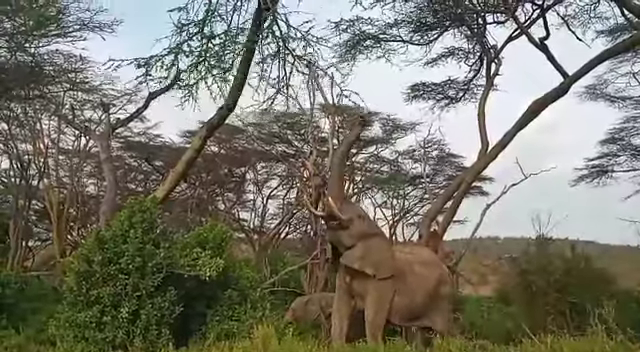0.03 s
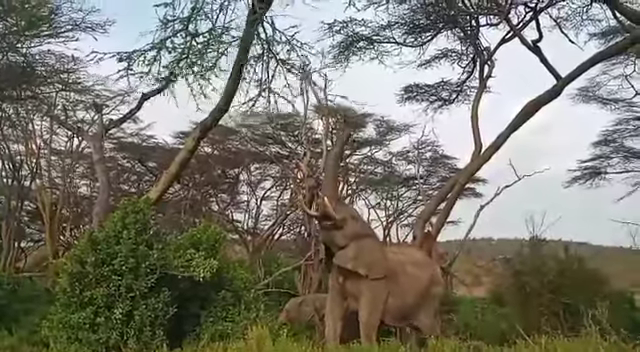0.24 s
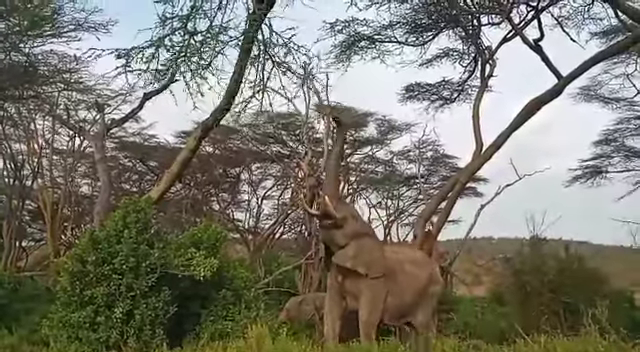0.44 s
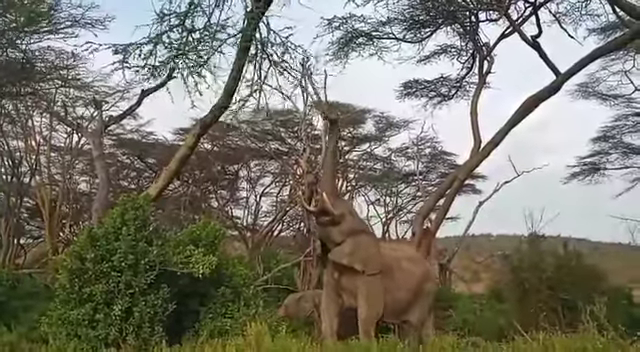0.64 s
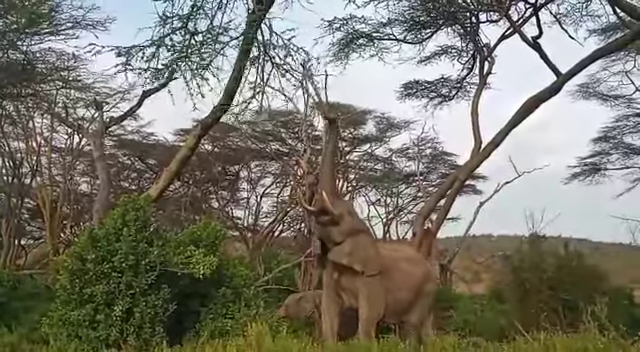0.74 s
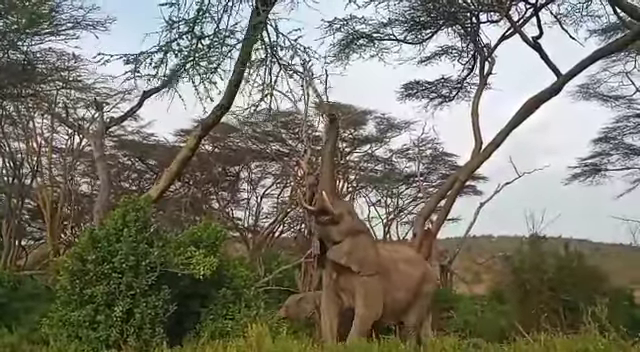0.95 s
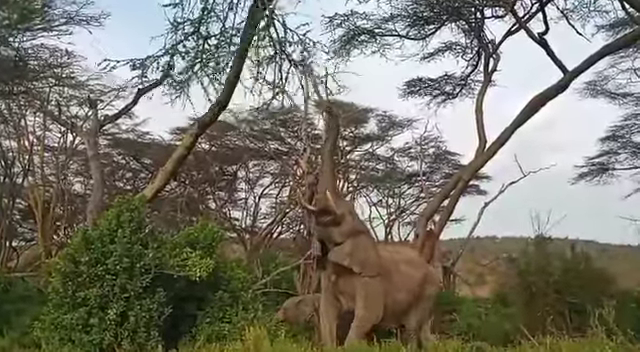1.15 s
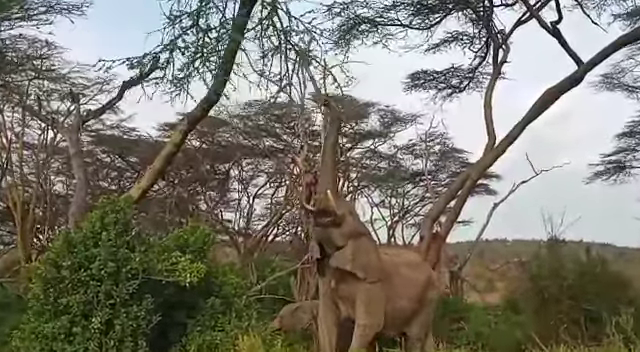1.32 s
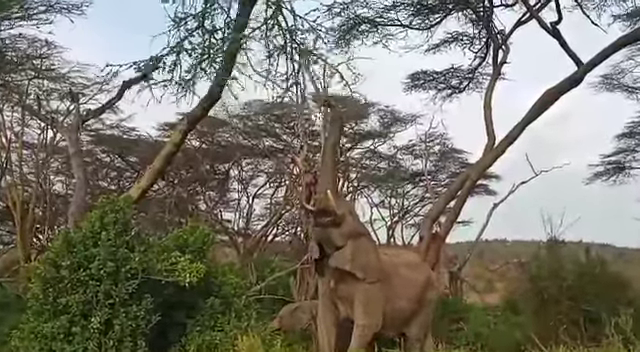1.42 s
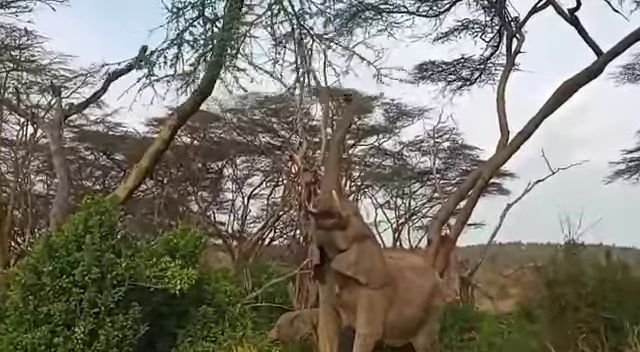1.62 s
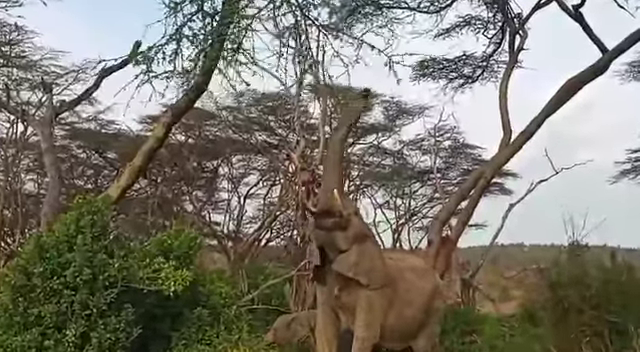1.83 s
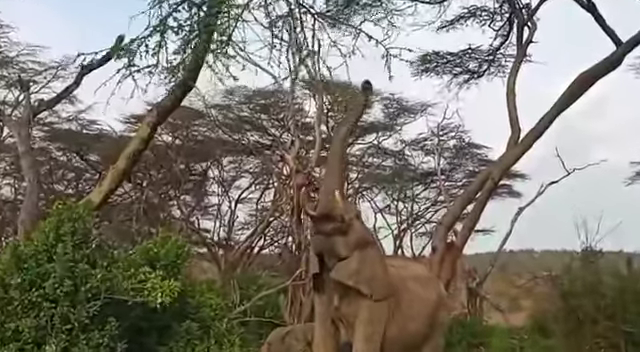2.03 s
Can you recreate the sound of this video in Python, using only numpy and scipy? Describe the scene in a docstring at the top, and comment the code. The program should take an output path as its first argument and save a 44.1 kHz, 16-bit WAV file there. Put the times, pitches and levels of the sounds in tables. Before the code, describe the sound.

A branch breaks with one loud dry crack and a short low boom, echoing lightly among trees; faint leaf rustle and twig crackle follow, with brief nasal bird calls and a whistle, heard from a distance in quiet open woodland.

```python
"""An elephant pulls a branch off a tree at the edge of open woodland, some way off.
Fibres tick as short damped pulses; the branch breaks with one sharp crack of decaying modes and splinter
grains, which scatters in the crown and among the trunks and is followed by a low boom.
The dragged foliage rustles in filtered grains. Distant birds give three nasal harmonic calls and
one nearly pure whistle over filtered noise: a faint low rumble of moving air and a fainter hiss."""
import sys
import numpy as np
from scipy import signal
from scipy.fft import rfft, irfft
from scipy.io import wavfile

SR = 44100
rng = np.random.default_rng(int(sys.argv[2]) if len(sys.argv) > 2 else 0)


def transcribe(signal):
    """Save signal, clipped to [-1, 1], as a 16-bit WAV file at the path in sys.argv[1]."""
    frames = np.atleast_2d(signal).T
    limited = np.clip(frames, -1, 1)
    pcm = np.round(limited * 32767).astype(np.int16)
    wavfile.write(sys.argv[1], SR, pcm)


N = 91463
T = np.arange(N) / SR   # time in seconds


def from_db(db):
    """A level in decibels is twenty times the logarithm of an amplitude; this inverts it."""
    return 10 ** (np.asarray(db) / 20)


def rms_one(x):
    """Normalisation: divide by the root mean square, so that it becomes 1."""
    return x / np.sqrt(np.mean(x ** 2) + 1e-20)


def in_time(rows):
    """Linear interpolation: join the rows of a curve by straight lines over time."""
    s, *columns = np.transpose(rows)
    return [np.interp(T, s, c) for c in columns]


def coloured(x, points):
    """Minimum-phase filtering: a causal filter with the given spectrum; white noise keeps its power."""
    hz, db = np.transpose(points)
    size = 4096
    bins_hz = np.arange(size // 2 + 1) * SR / size
    # + 1 Hz keeps the logarithm finite at zero
    gain = rms_one(from_db(np.interp(np.log(bins_hz + 1), np.log(hz), db)))
    # folding the cepstrum onto positive times makes the filter causal
    cepstrum = irfft(np.log(gain))
    cepstrum[1:size // 2] *= 2
    cepstrum[size // 2 + 1:] = 0
    impulse_response = irfft(np.exp(rfft(cepstrum)))
    return signal.fftconvolve(x, impulse_response)[:N]


def filtered(x, kind, order, hz):
    """Butterworth filtering: a passband without ripple, low or high."""
    return signal.sosfilt(signal.butter(order, hz, kind, fs=SR, output="sos"), x)


def noise(points):
    """Steady random noise of one colour, rms 1."""
    return rms_one(coloured(rng.standard_normal(N), points))


def drift(rate_hz):
    """Random modulation: noise below the given rate, with a spread of 1."""
    return rms_one(filtered(rng.standard_normal(N), "low", 2, rate_hz))


def dying(start_s, t60):
    """Exponential decay: silence, then a fall from 1 by 60 dB in t60 seconds."""
    return (T >= start_s) * np.exp(-np.log(1000) * np.maximum(T - start_s, 0) / t60)


def grains(per_s, spread_db):
    """Shot noise: clicks at random times, of uneven size and sign, rms 1."""
    sizes = from_db(spread_db * np.minimum(rng.exponential(1, N), 4))
    signs = rng.choice([-1, 1], N)
    return rms_one(sizes * signs * (rng.random(N) < per_s / SR))


def scatter(delay_s, t60):
    """Diffuse reflection: the response of many small reflectors, with an energy of 1."""
    return rms_one(rng.standard_normal(N) * dying(delay_s, t60)) / np.sqrt(N)


# Wood fibres that snap. Each row: start in seconds, peak of the envelope in dB, pitch in Hz,
# time to the peak in ms, scatter in the crown in dB relative to the pulse.
FIBRE_SNAPS = [(0.089, -60, 1160, 2.16, 4.5), (0.1466, -47, 1140, 1.6, -4), (0.1508, -46, 1765, 2.4, -8),
               (0.2637, -28.5, 1790, 0.37, -8), (0.3309, -37, 3820, 2.04, -15),
               (0.3337, -15.5, 1190, 0.68, -7), (0.3347, -24.5, 3700, 0.477, -8),
               (.3353, -20.5, 1940, .55, -15), (.3354, -45, 6600, 0.22, -2), (.3386, -50, 6250, 0.34, 3),
               (0.3389, -23, 1116, 1.2, -14), (.3408, -30, 2130, .9, -16), (0.3473, -30, 920, 1.5, -10),
               (.3670, -37, 1235, 1.5, -15), (0.4196, -44, 3930, 2.2, -12), (.4212, -43, 3130, 1.27, -3),
               (.5170, -53, 2580, 0.82, 5), (.9125, -44, 1297, 1.8, -5), (0.9182, -57.5, 1245, 1.72, -4),
               (1.3112, -48.5, 2150, 0.57, -0.5), (1.4391, -52.5, 1168, 3, -3),
               (1.8097, -42, 2700, 0.65, -3), (1.815, -45, 2660, 0.52, -7), (1.8167, -54.5, 1096, 4.0, -2),
               (1.828, -55, 1120, 3.0, -5)]
CROWN_DELAY_S, CROWN_T60_S = .004, .11
SNAP_LOW_HZ = 410   # thin fibres give off little below this


def snaps():
    """Impulsive radiation: each snap swells and dies within a few cycles, then scatters in the crown."""
    direct, sent = np.zeros((2, N))
    for s, db, hz, rise_ms, scatter_db in FIBRE_SNAPS:
        rise_s = rise_ms / 1000
        age = np.maximum(T - s, 0)
        u = age / rise_s
        envelope = (u * np.exp(1 - u)) ** 2   # reaches 1 at the rise time
        pulse = from_db(db) * envelope * np.sin(2 * np.pi * hz * (age - rise_s))
        direct += pulse
        sent += from_db(scatter_db) * pulse
    out = direct + signal.fftconvolve(sent, scatter(CROWN_DELAY_S, CROWN_T60_S))[:N]
    return filtered(out + 1e-18, "high", 4, SNAP_LOW_HZ)


BREAK_S = .3345   # the branch gives way
# Modes of the ringing branch. Each row: frequency in Hz, initial level in dB, decay by 60 dB in seconds.
BRANCH_MODES = [(218, -48, 0.28), (330, -37.5, 0.088), (556, -41.5, 0.14), (720, -46, 0.061),
                (845, -33.5, 0.12), (1083, -44, 0.056), (1183, -32.5, 0.06), (1262, -39, 0.096),
                (1358, -33.5, .1), (1568, -41, 0.048), (1870, -42.5, 0.063), (2005, -40, 0.085),
                (2193, -39, 0.076), (2420, -50, 0.077)]


def branch_ring():
    """Modal vibration: the break excites damped sines, with alternating sign."""
    ring = np.zeros(N)
    for k, (hz, db, t60) in enumerate(BRANCH_MODES):
        mode = from_db(db) * dying(BREAK_S, t60) * np.sin(2 * np.pi * hz * (T - BREAK_S))
        ring += (-1) ** k * mode
    return ring


# Spectrum of splintering wood. Each row: frequency in Hz, relative level in dB.
SPLINTER_SPECTRUM = [(40, -34), (150, -23.5), (260, -14), (360, -6.5), (600, -6.5), (1100, -1),
                     (2200, -1.5), (3000, -1), (4000, -3), (5200, -21), (7000, -36), (10000, -39.5),
                     (15500, -42.5)]
SPLINTERS_PER_S, SPLINTER_SPREAD_DB, SPLINTER_DB = 7000, 2.0, -28
SPLINTER_BUILD_S, SPLINTER_T60_S = 0.0061, 0.064


def splinters():
    """Superposed micro-fractures: a dense run of grains builds quickly and dies exponentially."""
    build = np.clip((T - BREAK_S) / SPLINTER_BUILD_S, 0, 1)
    envelope = build * dying(BREAK_S, SPLINTER_T60_S)
    clicks = grains(SPLINTERS_PER_S, SPLINTER_SPREAD_DB) * envelope
    return from_db(SPLINTER_DB) * coloured(clicks, SPLINTER_SPECTRUM)


EDGE_DB, EDGE_HZ, EDGE_T60_S = -67.5, 5400, 0.0382


def crack_edge():
    """High-passed transient: a decaying burst of noise gives the crack its thin bright edge."""
    burst = rng.standard_normal(N) * dying(BREAK_S, EDGE_T60_S)
    return from_db(EDGE_DB) * filtered(burst + 1e-18, "high", 2, EDGE_HZ)


# Spectrum of the boom. Each row: frequency in Hz, relative level in dB.
BOOM_SPECTRUM = [(25, -44), (50, -31), (68, -4.5), (95, 1.5), (140, -2.5), (210, -3.5), (270, -8),
                 (350, -10), (600, -7), (1200, -17.5), (4000, -62.5)]
BOOM_DB, BOOM_PEAK_S, BOOM_T60_S = -44.5, 0.029, 0.28   # peak is counted from the break


def boom():
    """Delayed low-frequency arrival: low sound follows the crack over the ground and outlasts it."""
    peak_s = BREAK_S + BOOM_PEAK_S
    swell = np.clip((T - BREAK_S) / BOOM_PEAK_S, 0, 1) * (T < peak_s)
    return from_db(BOOM_DB) * noise(BOOM_SPECTRUM) * (swell + dying(peak_s, BOOM_T60_S))


# Foliage dragged by the branch. Each row: time in seconds, level in dB before the flicker.
LEAF_LEVELS = [(0, -64), (.12, -65), (.29, -60.5), (.36, -57), (.52, -64), (.62, -67.5), (.85, -68),
               (.96, -70.5), (1.06, -69), (1.14, -63.5), (1.26, -60.5), (1.34, -65), (1.43, -68.5),
               (1.6, -62), (1.7, -66.5), (1.82, -57.5), (1.9, -77), (2.07, -71)]
# Spectrum of the leaves. Each row: frequency in Hz, relative level in dB.
LEAF_SPECTRUM = [(500, -36.5), (1200, -14.5), (1900, -12), (2550, -0.5), (3200, 0), (4050, 0.5),
                 (5200, -17.5), (6800, -17.5), (9500, -33.5), (15500, -43.5)]
LEAF_GRAINS_PER_S, LEAF_SPREAD_DB, LEAF_FLICKER_DB = 6000, 2.5, 0.66


def leaves():
    """Granular friction: dense leaf contacts merge into a hiss whose level flickers slightly."""
    level_db = in_time(LEAF_LEVELS)[0] + LEAF_FLICKER_DB * drift(40)
    contacts = grains(LEAF_GRAINS_PER_S, LEAF_SPREAD_DB) * from_db(level_db)
    return coloured(contacts, LEAF_SPECTRUM)


# Twigs that scrape and crackle. Each row: time in seconds, level in dB.
TWIG_LEVELS = [(0, -73.5), (.14, -63.5), (.19, -61), (.3, -59), (.4, -64.5), (.6, -63), (.9, -66.5),
               (1.05, -82.5), (1.29, -85.5), (1.33, -63.5), (1.42, -64.5), (1.62, -64.5), (1.7, -58.5),
               (1.77, -55.5), (1.8, -59), (1.83, -51.5), (1.88, -61), (2.07, -79.5)]
# Spectrum of the twigs. Each row: frequency in Hz, relative level in dB.
TWIG_SPECTRUM = [(400, -27), (850, -20.5), (1150, 2), (1700, 2.5), (2600, 8.5), (3300, 5), (4200, -0.5),
                 (5300, -18.5), (7000, -20.5), (10000, -43.5), (15500, -51.5)]
TWIG_GRAINS_PER_S, TWIG_SPREAD_DB = 4500, 2.5


def twigs():
    """Granular friction: sparser contacts than those of the leaves, in a lower band, scrape and crackle."""
    contacts = grains(TWIG_GRAINS_PER_S, TWIG_SPREAD_DB) * from_db(in_time(TWIG_LEVELS)[0])
    return coloured(contacts, TWIG_SPECTRUM)


# Calls of nasal birds. Each row: start in seconds, length in seconds, start pitch in Hz,
# turning pitch in Hz, end pitch in Hz, share of the length before the turn,
# then the rms levels of harmonics 1, 2, 3 and 4 in dB before the flutter.
NASAL_CALLS = [(0.613, .100, 905, 1022, 946, 0.53, -67, -64.5, -54.5, -75.5),
               (1.484, 0.16, 972, 1043, 974, .30, -103, -87, -66.5, -66.5),
               (1.621, 0.041, 1074, 1069, 920, .2, -86, -70.5, -54, -68.5)]
CALL_EDGE_S, CALL_JITTER, CALL_FLUTTER_DB = 0.0085, 0.0047, 2   # jitter is a fraction of the pitch


def nasal_birds():
    """Harmonic series: four partials share one gliding pitch, each fluttering on its way through the trees."""
    out = np.zeros(N)
    for s, length, start_hz, top_hz, end_hz, share, *levels in NASAL_CALLS:
        u = np.clip((T - s) / length, 0, 1)
        before = (start_hz - top_hz) * (1 - u / share) ** 2
        after = (end_hz - top_hz) * ((u - share) / (1 - share)) ** 2
        hz = top_hz + np.where(u < share, before, after)
        phase = 2 * np.pi * np.cumsum(hz * (1 + CALL_JITTER * drift(100))) / SR
        gate = np.clip(np.minimum(u, 1 - u) * length / CALL_EDGE_S, 0, 1)
        for k, db in enumerate(levels, 1):
            level = from_db(db + CALL_FLUTTER_DB * drift(60))
            out += np.sqrt(2) * gate * level * np.sin(k * phase)
    return out


# A whistling bird. Each row: time in seconds, pitch in Hz before the jitter, rms level of the note in dB.
WHISTLE_NOTE = [(1.446, 2187, -70.5), (1.468, 2267, -57), (1.502, 2425, -47.5), (1.516, 2439, -46),
                (1.526, 2494, -58.5), (1.534, 2478, -45.5), (1.550, 2479, -49), (1.606, 2483, -45.5),
                (1.630, 2459, -52.5), (1.645, 2350, -61)]
WHISTLE_JITTER = 0.0058   # fraction of the pitch
WHISTLE_OCTAVE_DB, OCTAVE_DB_PER_HZ = -30, 0.0514   # at the highest pitch; gain per Hz below it


def whistling_bird():
    """Frequency modulation: a nearly pure tone rises, holds and sinks a little, with a faint octave."""
    hz, db = in_time(WHISTLE_NOTE)
    phase = 2 * np.pi * np.cumsum(hz * (1 + WHISTLE_JITTER * drift(200))) / SR
    level = from_db(db) * (T > WHISTLE_NOTE[0][0]) * (T < WHISTLE_NOTE[-1][0])
    octave = from_db(WHISTLE_OCTAVE_DB + OCTAVE_DB_PER_HZ * (hz.max() - hz))
    return np.sqrt(2) * level * (np.sin(phase) + octave * np.sin(2 * phase))


# Spectrum of the scatter from the trunks. Each row: frequency in Hz, relative level in dB.
TRUNK_SPECTRUM = [(60, 12), (300, -26.5), (600, 1.5), (1200, -4), (2500, 2.5), (4000, -2.5), (8000, 3.5),
                  (15500, -17)]
TRUNK_DELAY_S, TRUNK_T60_S = 0.021, 0.92
WOOD_TRUNKS_DB, CALL_TRUNKS_DB, WHISTLE_TRUNKS_DB = -20, -15.5, -19


def trunk_scatter(wood, calls, whistle):
    """Multiple scattering: convolution with a decaying response spreads sound among the trunks."""
    sent = from_db(WOOD_TRUNKS_DB) * wood
    sent = sent + from_db(CALL_TRUNKS_DB) * calls
    sent = sent + from_db(WHISTLE_TRUNKS_DB) * whistle
    trunks = coloured(scatter(TRUNK_DELAY_S, TRUNK_T60_S), TRUNK_SPECTRUM)
    return signal.fftconvolve(sent, trunks)[:N]


BUSH_DELAY_S, BUSH_T60_S = .004, 0.17
CALL_BUSH_DB, WHISTLE_BUSH_DB = -4.5, -17


def bush_scatter(calls, whistle):
    """Near-field scattering: each bird's sound spreads in the bush it sits in."""
    call_bush = from_db(CALL_BUSH_DB) * scatter(BUSH_DELAY_S, BUSH_T60_S)
    whistle_bush = from_db(WHISTLE_BUSH_DB) * scatter(BUSH_DELAY_S, BUSH_T60_S)
    return (signal.fftconvolve(calls, call_bush) + signal.fftconvolve(whistle, whistle_bush))[:N]


# Spectrum of the return from the tree line. Each row: frequency in Hz, relative level in dB.
TREE_LINE_SPECTRUM = [(900, -15.5), (2050, 5), (2500, -12), (3100, -9), (4500, -12.5)]
TREE_LINE_DB, TREE_LINE_DELAY_S, TREE_LINE_T60_S = -16.5, 0.083, 0.42


def tree_line_echo(calls):
    """Delayed reflection: the nasal calls return late and diffuse from the tree line."""
    response = coloured(scatter(TREE_LINE_DELAY_S, TREE_LINE_T60_S), TREE_LINE_SPECTRUM)
    return from_db(TREE_LINE_DB) * signal.fftconvolve(calls, response)[:N]


# Low rumble of the air. Each row: time in seconds, level in dB.
RUMBLE_LEVELS = [(0, -70.5), (.08, -73), (.15, -84), (.25, -69.5), (.48, -77), (.58, -69.5), (.82, -65.5),
                 (.89, -80), (1.14, -72.5), (1.28, -84), (1.34, -64.5), (1.41, -82.5), (1.53, -67.5),
                 (1.65, -80.5), (1.74, -64.5), (1.88, -76), (1.99, -63), (2.07, -90)]
# Spectrum of the rumble. Each row: frequency in Hz, relative level in dB.
RUMBLE_SPECTRUM = [(20, -28.5), (45, -14.5), (75, -0.5), (110, 1.5), (160, 0.5), (240, -14.5), (500, -36),
                   (2000, -61.5)]
# Spectrum of the hiss. Each row: frequency in Hz, relative level in dB.
HISS_SPECTRUM = [(20, 4), (120, 0.5), (300, 0.5), (700, -3.5), (1200, -2.5), (3000, -1), (4200, -16.5),
                 (5500, -18), (10000, -24), (15500, -25.5)]
HISS_DB = -72


def air():
    """Broadband random noise: a low uneven rumble under a faint even hiss."""
    rumble = from_db(in_time(RUMBLE_LEVELS)[0]) * noise(RUMBLE_SPECTRUM)
    return rumble + from_db(HISS_DB) * noise(HISS_SPECTRUM)


def scene():
    """Superposition: direct sounds add to their reflections and to the background."""
    wood = snaps() + branch_ring() + splinters() + crack_edge()
    calls, whistle = nasal_birds(), whistling_bird()
    direct = wood + boom() + leaves() + twigs() + calls + whistle
    echoes = trunk_scatter(wood, calls, whistle) + bush_scatter(calls, whistle) + tree_line_echo(calls)
    return (direct + echoes + air())[None]


def record(dry):
    """Band limitation: a steep elliptic low-pass cuts the top above 15.5 kHz."""
    low_pass = signal.ellip(10, .1, 70, 15500, fs=SR, output="sos")   # ripple and stopband in dB
    return signal.sosfilt(low_pass, dry)


dry = scene()
out = record(dry)
transcribe(out)
```